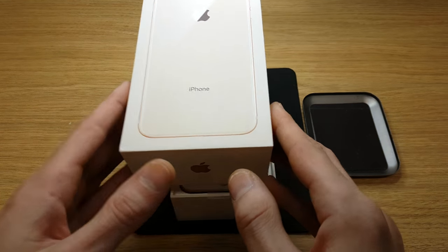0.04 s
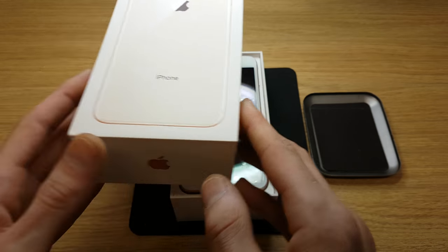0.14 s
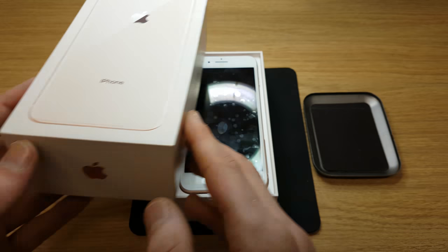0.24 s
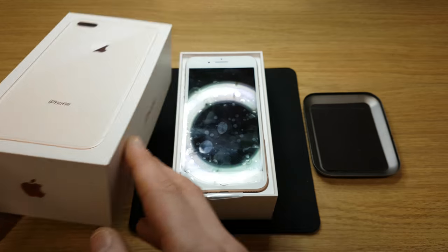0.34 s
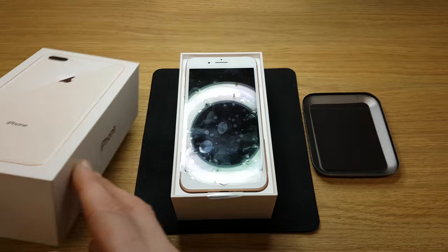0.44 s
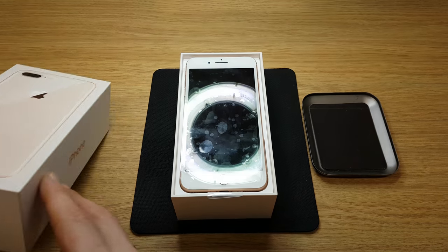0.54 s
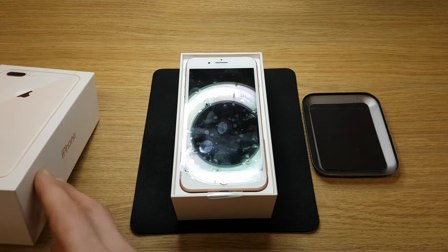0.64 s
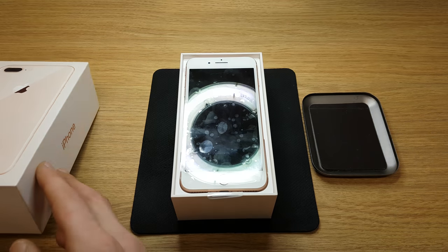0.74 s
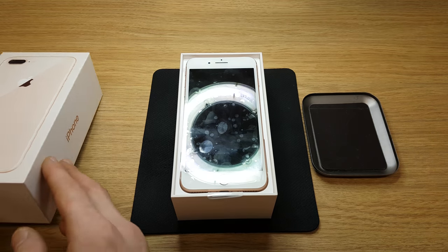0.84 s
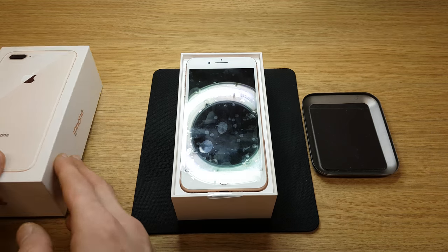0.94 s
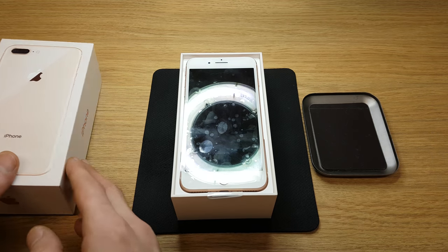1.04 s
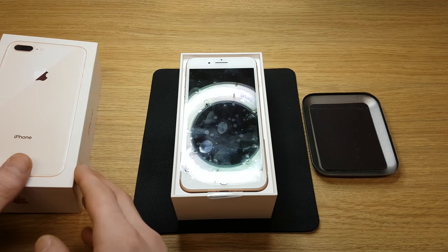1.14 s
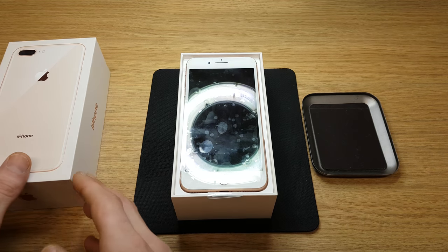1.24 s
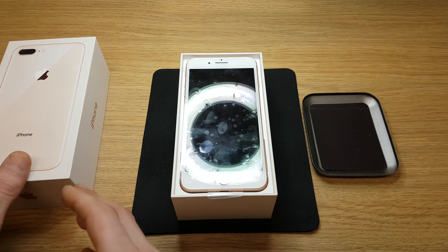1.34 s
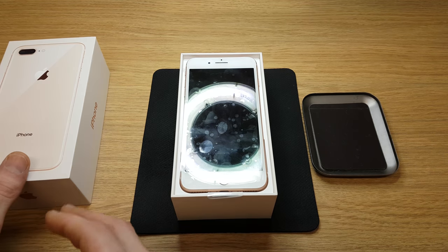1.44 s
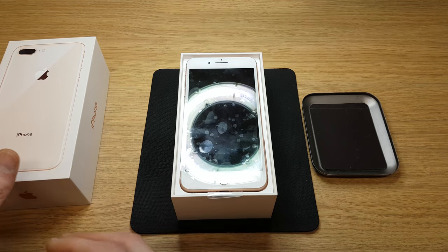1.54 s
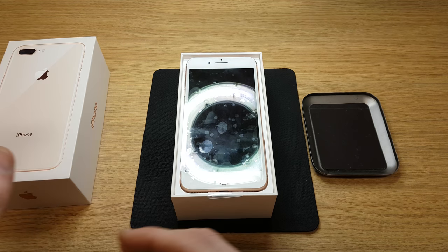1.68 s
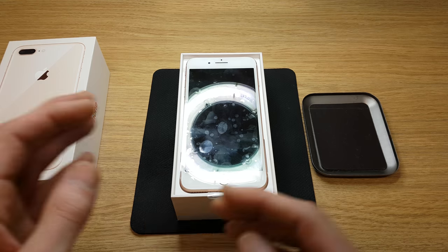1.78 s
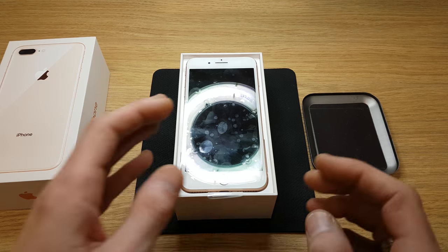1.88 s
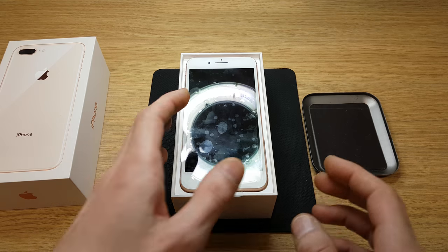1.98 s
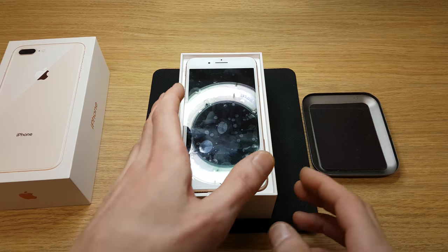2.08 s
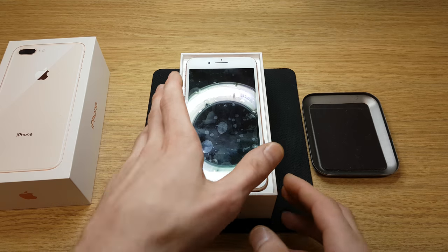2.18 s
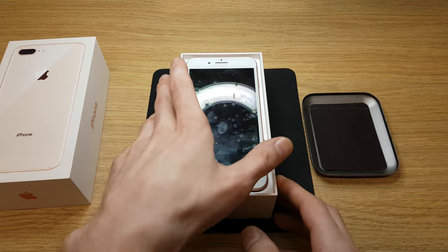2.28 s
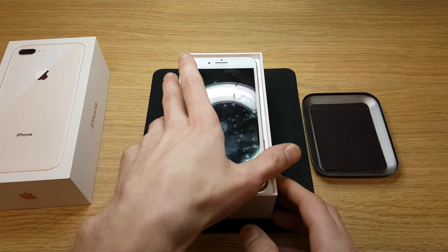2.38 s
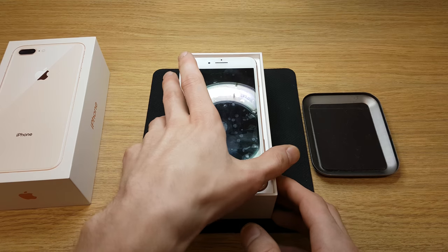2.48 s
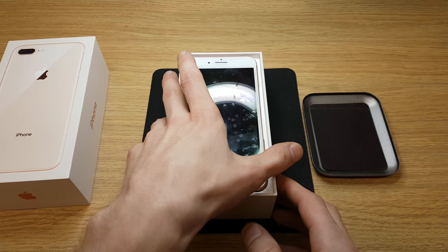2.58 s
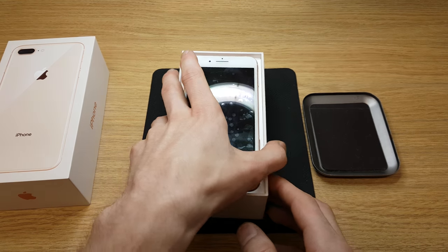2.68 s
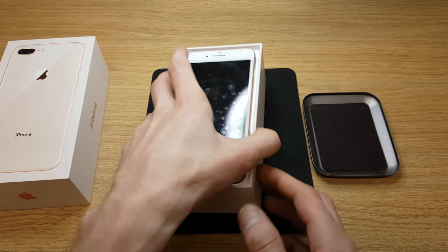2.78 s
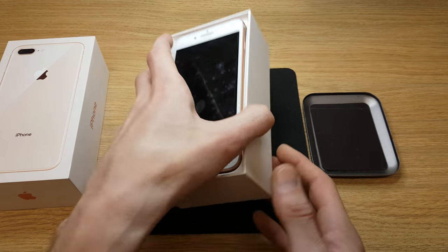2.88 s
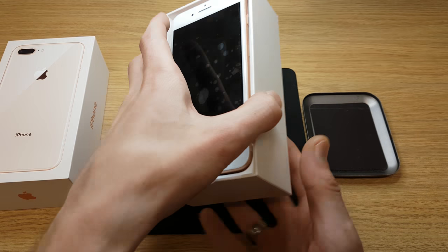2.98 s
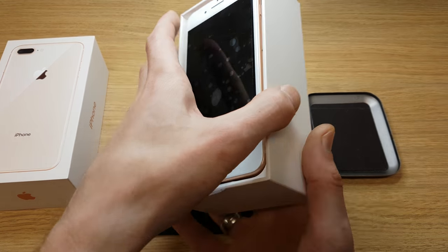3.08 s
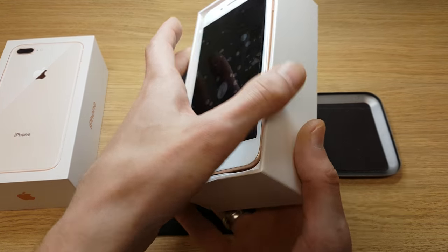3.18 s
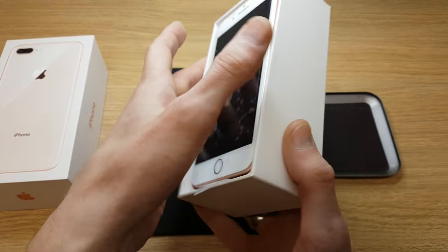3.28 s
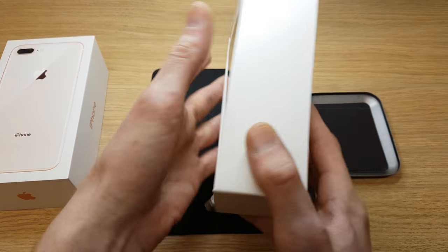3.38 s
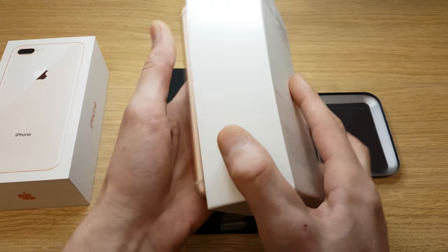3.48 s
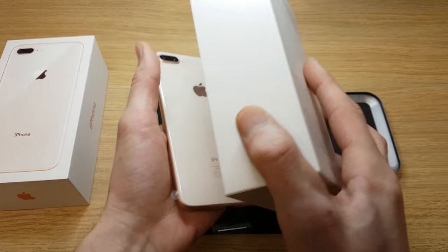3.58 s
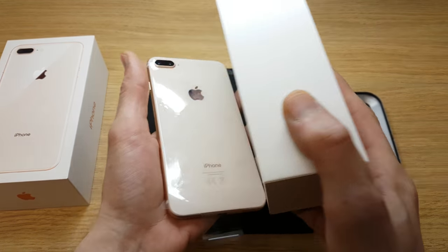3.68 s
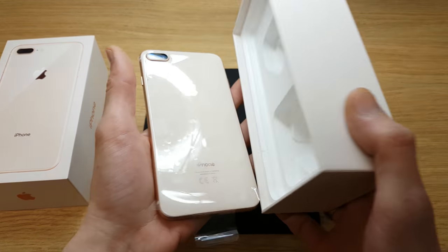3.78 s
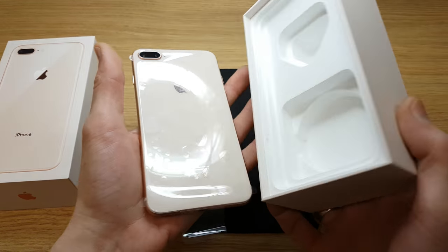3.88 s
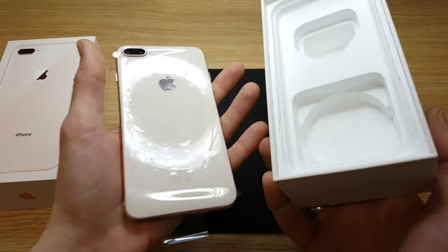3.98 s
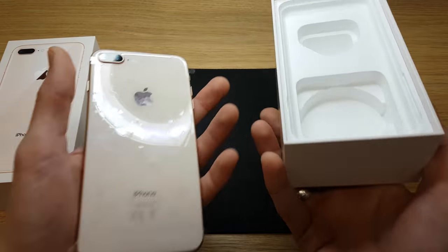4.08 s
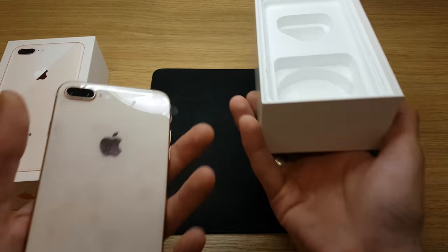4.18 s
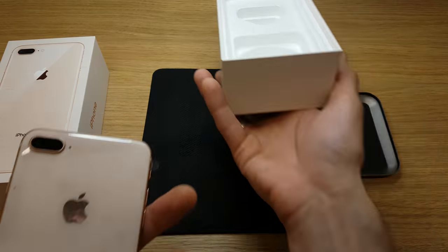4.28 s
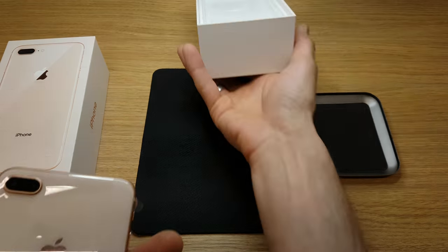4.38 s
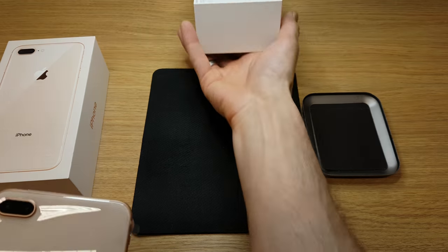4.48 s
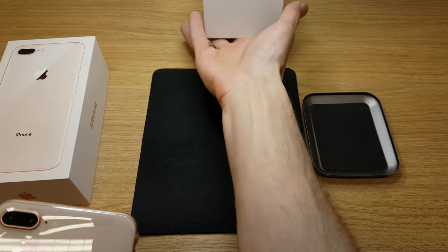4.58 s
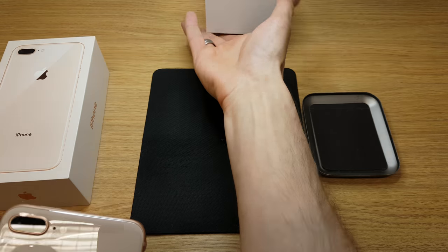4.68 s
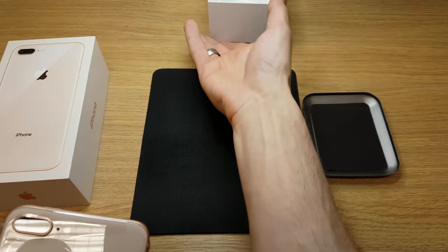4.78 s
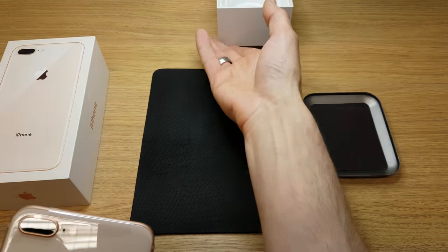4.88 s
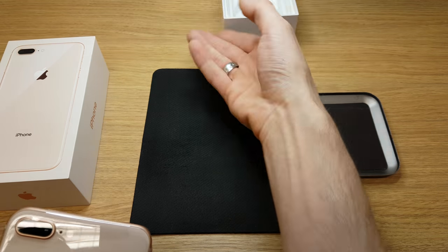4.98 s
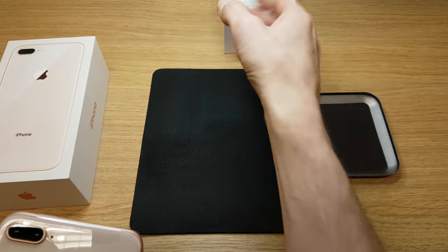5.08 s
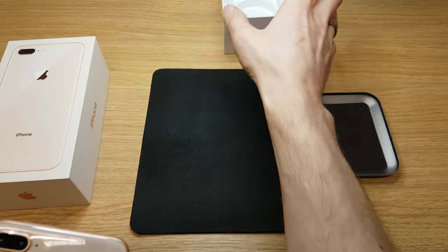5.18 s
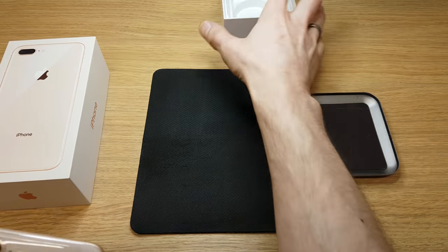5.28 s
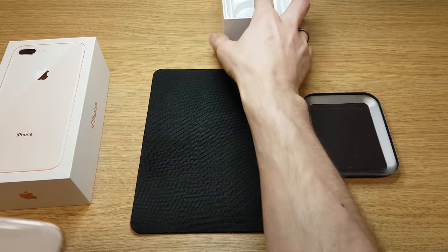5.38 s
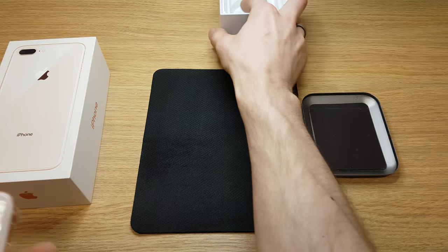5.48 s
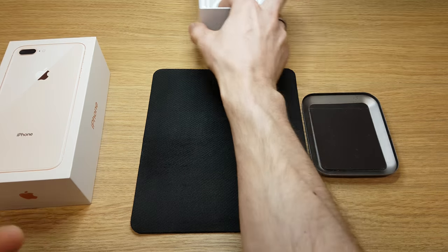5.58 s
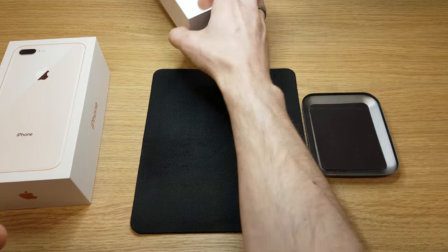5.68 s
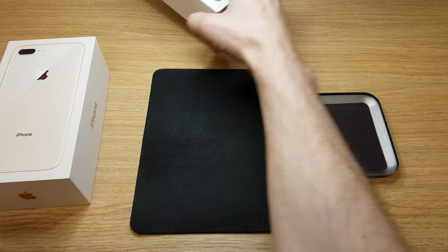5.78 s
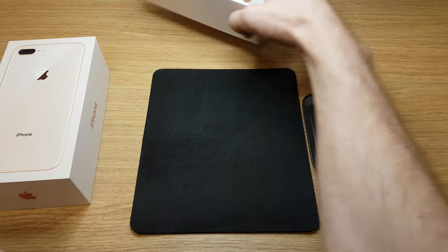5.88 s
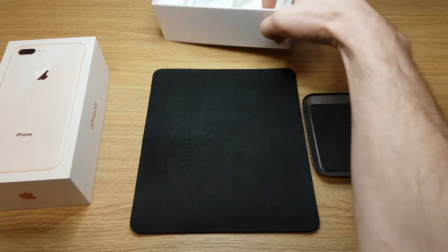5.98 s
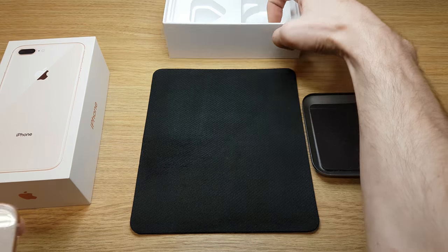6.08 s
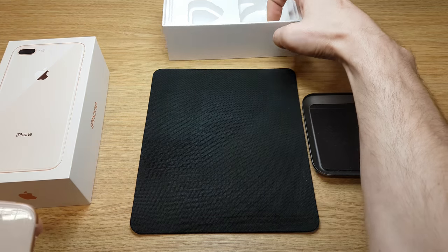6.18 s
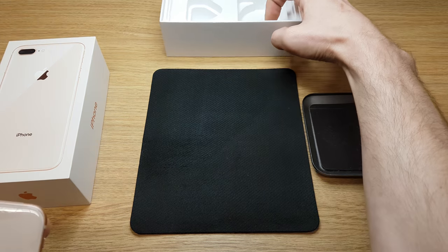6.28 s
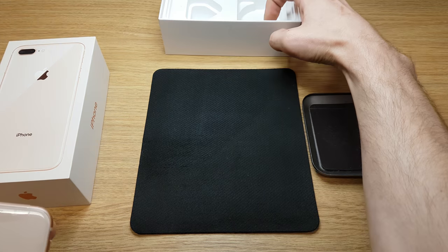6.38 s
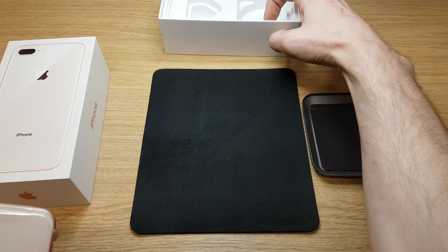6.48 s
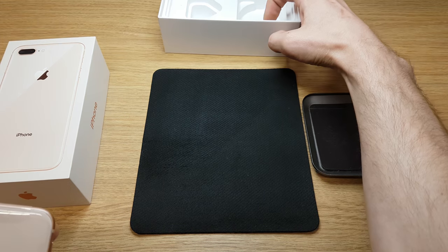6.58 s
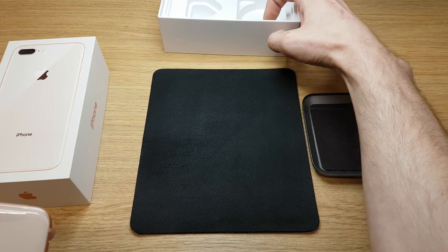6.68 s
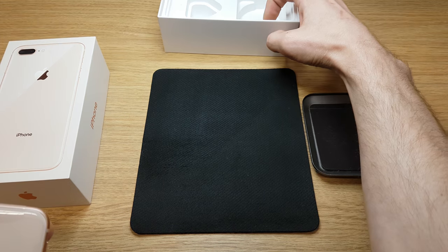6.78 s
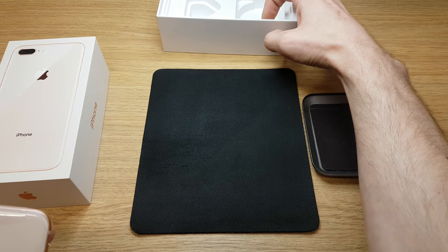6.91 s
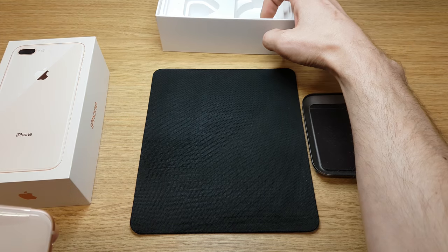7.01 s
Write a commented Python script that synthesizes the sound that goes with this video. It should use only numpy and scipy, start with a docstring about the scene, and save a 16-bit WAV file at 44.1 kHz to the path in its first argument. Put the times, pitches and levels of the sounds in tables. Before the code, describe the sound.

Cardboard box parts are handled on a wooden desk, heard close up in stereo with a short, bare room echo. Light lid bumps lead to a hard, hollow thump, followed by a dry click in the left channel. Quiet film crackle and sliding come next, then a quick cluster of tray knocks, a few softer touches and a last firm set-down, fading to soft hiss and wavering low rumble.

```python
"""A wooden desk in a quiet, bare room: a stiff cardboard lid and a box tray are set down and nudged on it.
A slab tips out of the tray and its plastic film crackles; one electric pop jolts the left microphone.
A faint hum, a low rumble that comes and goes and a steady hiss lie under it all.
Knocks and slides ring banks of dying sines; film is clumped snaps, the pop a filtered step;
rumble and hiss are shaped noise, the hum a wavering sine."""
import sys
import numpy as np
from scipy import signal
from scipy.fft import rfft, irfft
from scipy.io import wavfile
from scipy.ndimage import uniform_filter1d

SR = 44100
rng = np.random.default_rng(int(sys.argv[2]) if len(sys.argv) > 2 else 0)


def dump(signal):
    """Clip the signal to [-1, 1] and save it as 16-bit WAV at the path in sys.argv[1]."""
    limited = np.clip(np.atleast_2d(signal).T, -1, 1)
    pcm = np.round(limited * 32767).astype(np.int16)
    wavfile.write(sys.argv[1], SR, pcm)


N = 310663

# Direct grit of sliding tray and slab. Each row: frequency in Hz, relative density in dB per Hz.
GRIT = [(800, -11.5), (2000, 9.5), (4000, -4), (8000, -17), (16000, -28)]


def amp(db):
    """Decibels to gain."""
    return 10 ** (np.asarray(db) / 20)


def evened(x):
    """Scales to rms 1."""
    return x / np.sqrt(np.mean(x ** 2) + 1e-20)


def peaked(x):
    """Scales to peak 1."""
    return x / (abs(x).max() + 1e-20)


def read(points, hz):
    """Reads a (Hz, value) table on a log-frequency axis."""
    point_hz, value = np.transpose(points)
    return np.interp(np.log(hz + 1), np.log(point_hz + 1), value)


def add(mix, start_s, sound):
    """Mixes a sound in at start_s, cut at the end of the mix."""
    part = mix[round(start_s * SR):][:len(sound)]
    part += sound[:len(part)]


def coloured(x, spectrum):
    """Filters by a (Hz, dB) spectrum."""
    hz = np.fft.rfftfreq(x.shape[-1], 1 / SR)
    return irfft(rfft(x) * amp(read(spectrum, hz)), x.shape[-1])


def lid_sound():
    """Stiff cardboard lid: long low modes, struck and slid."""
    # Each row: start in seconds, peak in dB, brightness in dB per octave,
    # edge tick and desk thud in dB re peak (rms over the first 10 ms).
    knock_rows = [(0.215, -51, 7, -41, -41), (0.379, -59.5, -14.5, -9, -16), (0.671, -28, -10, -41, -33),
                  (0.832, -40.5, -3.5, -35, -26), (0.897, -17, -9, -30, -30), (0.95, -40.5, -1, -31, -26.5),
                  (1.265, -20, 1, -42.5, -37), (1.3585, 2, 7, -29.5, -43), (1.467, -21.5, 12, -24, -33.5)]
    # Each row: start in seconds, length in seconds, level at start in dB, level at end in dB.
    slide_rows = [(0.0, .06, -49.5, -98.5), (0.76, 0.16, -62, -48.5), (0.92, .09, -41, -46.5),
                  (1.02, .17, -52, -67), (1.295, .05, -44, -38.5)]
    # Modes. Each row: frequency in Hz, level in dB, t60 in seconds.
    modes = [(161, -16.5, 0.13), (261, -12.5, 0.034), (346.3, -5.5, 0.053), (433, -11.5, 0.2),
             (526.3, 0.5, 0.071), (900, -3.5, .008), (1320, -5.5, .008), (1800, -11.5, 0.0052),
             (2148, -16.5, 0.0086)]
    # Direct grit. Each row: frequency in Hz, relative density in dB per Hz.
    grit = [(800, -14), (1290, 2), (1850, -6.5), (2330, 2.5), (3000, -11), (3800, -7.5), (4500, -13),
            (5000, -6), (5500, -16), (6100, -12.5), (9000, -25.5), (16000, -33.5)]
    return knocks(knock_rows, modes) + slides(slide_rows, modes, grit, grit_db=-14.5)


def tray_sound():
    """Box tray: short modes, struck and slid."""
    # Each row: start in seconds, peak in dB, brightness in dB per octave,
    # edge tick and desk thud in dB re peak (rms over the first 10 ms).
    knock_rows = [(2.316, -48.5, 0, -19.5, -6), (3.172, -55, -13, -14, -38), (3.52, -44, -6, -21, -41),
                  (4.512, -10, -1.2, -24, -34), (4.52, -9, 3.7, -31.5, -22), (4.614, -10, 3.5, -29, -28),
                  (4.62, -17, 11, -31, -35), (4.644, -16, 4, -28.5, -45), (4.669, -17.5, 0, -24.5, -23.5),
                  (4.676, -17.5, 10, -35, -32), (4.908, -33.5, -7, -23, -25),
                  (5.042, -17.5, -5.9, -23, -13.5), (5.127, -57.5, 14, 2, -4),
                  (5.755, -51.5, 11.5, -15.5, -5), (6.061, -7.5, -2.5, -26.5, -25.5),
                  (6.181, -19.5, -6, -22, -12.5)]
    # Each row: start in seconds, length in seconds, level at start in dB, level at end in dB.
    slide_rows = [(4.53, 0.065, -41, -58), (4.685, 0.14, -35, -58.5), (6.075, .06, -55, -40)]
    # Modes. Each row: frequency in Hz, level in dB, t60 in seconds.
    modes = [(291.4, -8.5, 0.03), (516, -4.5, 0.041), (661, -5.5, 0.039), (838, -2.5, 0.016),
             (1067, 0.5, 0.015), (1287, -4.5, 0.0061), (1704, 3.5, 0.0044), (2235, -22, 0.0096)]
    return knocks(knock_rows, modes) + slides(slide_rows, modes, GRIT, grit_db=-7.5)


def slab_sound():
    """Slab tipping out: a few short modes, struck and slid, plus its film."""
    # Each row: start in seconds, peak in dB, brightness in dB per octave,
    # edge tick and desk thud in dB re peak (rms over the first 10 ms).
    knock_rows = [(3.553, -30, -1.5, -41, -52), (3.615, -49, -1.7, -9, -50), (3.634, -41, -6, -9, -59),
                  (3.638, -23, 0.5, -52, -48.5), (3.952, -32.5, 0.3, -18.5, -65)]
    # Each row: start in seconds, length in seconds, level at start in dB, level at end in dB.
    slide_rows = [(3.56, 0.091, -52.5, -53.5), (3.655, .075, -69, -84), (3.737, 0.024, -62, -83),
                  (3.962, .09, -61, -87.5)]
    # Modes. Each row: frequency in Hz, level in dB, t60 in seconds.
    modes = [(430, 0, 0.034), (820, 6.5, 0.025), (1085, 8, 0.011), (1520, 4, 0.0074), (1900, -28.5, 0.018)]
    return knocks(knock_rows, modes) + slides(slide_rows, modes, GRIT, grit_db=-15.5) + film()


def knocks(rows, modes):
    """The contact spreads along the edge, so the ring swells briefly; the edge ticks and the desk thuds."""
    # Desk modes. Each row: frequency in Hz, level in dB, t60 in seconds.
    desk_modes = [(98, -1, 0.21), (180, -9, 0.42), (245, -3, 0.091)]
    # Edge tick before tilt. Each row: frequency in Hz, relative density in dB per Hz.
    tick_spectrum = [(700, -13), (1900, 0), (3200, -2), (5000, -7), (9000, -28), (16000, -33)]
    rise_ms, box_bass_hz = 1.3, 160
    out, t_s, first = np.zeros(N), np.arange(SR // 3) / SR, SR // 100
    swell = np.minimum(t_s * 1000 / rise_ms, 1) ** 2
    b, a = signal.butter(2, box_bass_hz, "high", fs=SR)  # a small box sends out little bass
    for start_s, peak_db, bright_db, tick_db, desk_db in rows:
        body = peaked(signal.lfilter(b, a, swell * ring(modes, bright_db, spread_db=.7)))

        hz, db = np.transpose(tick_spectrum)
        # a fainter tick comes from a softer edge and is duller
        db = db + 0.34 * (tick_db + 26.5) * np.log2(hz / 2000)
        burst = scattered(np.transpose([hz, db]), 0.63, 9.1, count=50)
        tick = burst[:first] * swell[:first]

        thud = ring(desk_modes) * np.minimum(t_s / .003, 1)
        add(out, start_s, amp(peak_db) * body)
        add(out, start_s, amp(peak_db + tick_db) * evened(tick))
        add(out, start_s, amp(peak_db + desk_db) * thud / np.std(thud[:first]))
    return out


def slides(rows, modes, grit, grit_db):
    """Uneven micro-slips ring the modes; part of their grit is heard directly."""
    clumps = evened(uniform_filter1d(rng.standard_normal(N), 250))  # slips come in bunches
    slip_db = 3. * rng.standard_normal(N) + 4. * clumps
    slips = rng.standard_normal(N) * amp(slip_db)
    ringing = evened(signal.oaconvolve(slips, ring(modes))[:N])
    direct_grit = amp(grit_db) * evened(coloured(slips, grit))
    level = np.zeros(N)
    for start_s, length_s, from_db, to_db in rows:
        add(level, start_s, amp(np.linspace(from_db, to_db, round(length_s * SR))))
    return (ringing + direct_grit) * uniform_filter1d(level, 300)


def ring(modes, bright_db=0., spread_db=0.):
    """Answer to one click: dying sines, neighbours in opposite phase, weights optionally drawn anew."""
    body_hz = 444  # modes below this share one brightness gain
    t_s = np.arange(SR // 3) / SR
    hz, db, t60_s = np.transpose(modes)[:, :, None]
    tilt_db = bright_db * np.log2(np.maximum(hz, body_hz) / 600)
    db = db + tilt_db + spread_db * rng.standard_normal(db.shape)
    sign = (-1.) ** np.arange(len(hz))[:, None]
    sines = sign * amp(db - 60 * t_s / t60_s) * np.sin(2 * np.pi * hz * t_s)
    return sines.sum(0)


def scattered(spectrum, from_ms, to_ms, count):
    """One click whose bands arrive at scattered moments: a short burst of the given spectrum."""
    hz = np.fft.rfftfreq(2048, 1 / SR)
    band_hz = np.linspace(0, SR / 2, count)
    place = np.interp(hz, band_hz, rng.random(count)) ** 2  # squared: most bands come early
    late_s = (from_ms + (to_ms - from_ms) * place) / 1000
    cycles = np.cumsum(late_s) * hz[1]  # phase is the integral of delay over frequency
    return irfft(amp(read(spectrum, hz)) * np.exp(-2j * np.pi * cycles))


def film():
    """Plastic film: each crackle is a clump of tiny bright snaps."""
    # Each row: start in seconds, peak in dB, length in ms.
    crackles = [(3.5531, -35.5, 6.5), (3.5873, -41.5, 13), (3.6379, -34.5, 10), (3.7362, -35.5, 7.3),
                (3.9525, -39.5, 6.5)]
    # Each row: frequency in Hz, relative density in dB per Hz.
    spectrum = [(1180, -28), (2000, 6), (6880, 6), (7570, 5), (10000, -1), (16000, 1)]
    out = np.zeros(N)
    for start_s, peak_db, length_ms in crackles:
        snaps = scattered(spectrum, 0.87, length_ms, count=120)[:1500]
        add(out, start_s, amp(peak_db) * peaked(snaps))
    return out


def pop():
    """A sudden two-stage step in the left circuit, which the bass roll-off pulls back with an undershoot."""
    start_s, step_db, rolloff_hz, damping = 2.4, -5.5, 91, 0.56
    stage_gap_s, lead_s = 57e-6, 64 / SR  # lead: room for the smoothed onset
    hz = np.fft.rfftfreq(4096, 1 / SR)
    two_stages = (1 + np.exp(-2j * np.pi * hz * stage_gap_s)) / 2
    smoothing = np.exp(-2j * np.pi * hz * lead_s - (hz / 19000) ** 2)
    step = np.cumsum(irfft(two_stages * smoothing))
    w = 2 * np.pi * rolloff_hz
    b, a = signal.bilinear([1, 0, 0], [1, 2 * damping * w, w * w], SR)
    left = np.zeros(N)
    add(left, start_s - lead_s, amp(step_db) * signal.lfilter(b, a, step))
    return left * np.array([[1], [0]])


def direct(near):
    """Sound reaches each microphone straight and off the desk top, as delayed, scaled copies."""
    # Each row: left delay in ms, right delay in ms, left gain in dB, right gain in dB.
    paths = [(0, 0.078, 0.84, 0.5), (.55, 0.45, -18, -13.5), (1.7, 1.4, -12.5, -10.5),
             (3.1, 3.8, -11.5, -12)]
    t_s, out = np.arange(N) / SR, np.zeros((2, N))
    for left_ms, right_ms, left_db, right_db in paths:
        out[0] += amp(left_db) * np.interp(t_s - left_ms / 1000, t_s, near)
        out[1] += amp(right_db) * np.interp(t_s - right_ms / 1000, t_s, near)
    return out


def room(x):
    """Sparse taps of random sign, each band dying at its own speed, building up over the first echoes."""
    # Each row: frequency in Hz, t60 in seconds.
    decay = [(100, 0.59), (500, 0.59), (2000, 0.51), (5000, 0.51), (12000, 0.5)]
    # Each row: frequency in Hz, gain in dB.
    colour = [(60, -10), (200, -0.5), (700, -4), (2000, 0), (5000, -3.7), (9000, 0), (14000, -6.5)]
    taps = np.zeros((2, SR))
    at = np.arange(200, SR - 16, 16) + rng.integers(0, 16, (2, (SR - 201) // 16))
    np.put_along_axis(taps, at, rng.choice([-1., 1.], at.shape), 1)
    hz, t_s, bands = signal.stft(paired(taps), SR, nperseg=256)
    bands = bands * amp(-60 * t_s / read(decay, hz)[:, None])
    tail = signal.istft(bands, SR, nperseg=256)[1][:, :SR]
    tail *= np.clip((np.arange(SR) / SR - .004) / 0.0069, 0, 1)
    tail = tail / np.linalg.norm(tail[0])
    return signal.fftconvolve(coloured(x, colour)[None], tail, axes=1)[:, :N]


def paired(x):
    """Makes two unrelated signals as alike as a diffuse sound is at two nearby microphones."""
    # Each row: frequency in Hz, left-right likeness (0 to 1).
    likeness = [(60, 0.95), (130, .93), (290, 0.76), (640, 0.61), (1400, 0.012), (15000, 0.0051)]
    same = np.clip(read(likeness, np.fft.rfftfreq(x.shape[1], 1 / SR)), 0, 1)
    mid, side = rfft(x)
    mid, side = mid * np.sqrt((1 + same) / 2), side * np.sqrt((1 - same) / 2)
    return irfft(np.array([mid + side, mid - side]), x.shape[1])


def background():
    """Steady hiss; a rumble in two parts and a slightly wavering hum swell together."""
    # Deep rumble level. Each row: time in seconds, level in dB.
    rumble_level = [(0.0, -80.5), (0.62, -67.5), (0.842, -57), (1.61, -57), (2.0, -59), (2.31, -55.5),
                    (2.601, -58.5), (3.0, -70), (3.41, -78), (3.841, -73), (4.37, -57), (5.102, -57.5),
                    (5.451, -55.5), (6.212, -62), (6.55, -60.5), (7.04, -62)]
    # Spectra. Each row: frequency in Hz, relative density in dB per Hz.
    deep_spectrum = [(20, -8), (31, -5), (38, 8), (46, 4), (65, -14), (78, -8.5), (97, 5.5), (110, -13.5),
                     (150, -56)]
    upper_spectrum = [(110, -28.5), (145, -2.5), (200, -2.5), (242, 4.5), (270, -4.5), (315, -3),
                      (450, -15.5), (900, -38.5)]
    hiss_spectrum = [(15, -26), (25, 3.5), (64, -14), (123, -7.5), (166, -18.5), (317, -11.5), (503, -20.5),
                     (560, -18), (887, -21), (2110, -23.5), (8830, -39.5), (14800, -34.5), (16000, -42.5)]
    hiss_db, hum_hz, waver_hz = -65, 120, 2.1
    # upper rumble and hum: level when the deep rumble is at ref_db; share of its swings in dB
    ref_db, upper_db, upper_follows, hum_db, hum_follows = -58, -65.5, .8, -60.5, .8

    hiss, deep, upper = (paired(rng.standard_normal((2, N))) for _ in range(3))
    hiss = amp(hiss_db) * evened(coloured(hiss, hiss_spectrum))
    deep_db = np.interp(np.arange(N) / SR, *np.transpose(rumble_level))
    swing_db = deep_db - ref_db
    deep = amp(deep_db) * evened(coloured(deep, deep_spectrum))
    upper = amp(upper_db + upper_follows * swing_db) * evened(coloured(upper, upper_spectrum))

    waver = evened(uniform_filter1d(uniform_filter1d(rng.standard_normal(N), 3000), 3000))
    hum = np.sqrt(2) * np.sin(2 * np.pi * np.cumsum(hum_hz + waver_hz * waver) / SR)
    hum *= amp(hum_db + hum_follows * swing_db)
    return hiss + deep + upper + hum


def scene():
    """Lid, tray and slab reach the microphones straight, off the desk and through the room."""
    tray_room_db, slab_room_db = -1, -4.5  # things held nearer the microphones stir the room less
    lid, tray, slab = lid_sound(), tray_sound(), slab_sound()
    near = lid + tray + slab
    far = lid + amp(tray_room_db) * tray + amp(slab_room_db) * slab
    return direct(near) + room(far) + pop() + background()


def record(dry):
    """Peaks beyond full scale clip; then a linear-phase low-pass limits the band."""
    edge_hz = 16000
    low_pass = signal.firwin(511, edge_hz, window=("kaiser", 9), fs=SR)[None]
    return signal.oaconvolve(np.clip(dry, -1, 1), low_pass, "same")


dry = scene()
out = record(dry)
dump(out)
```